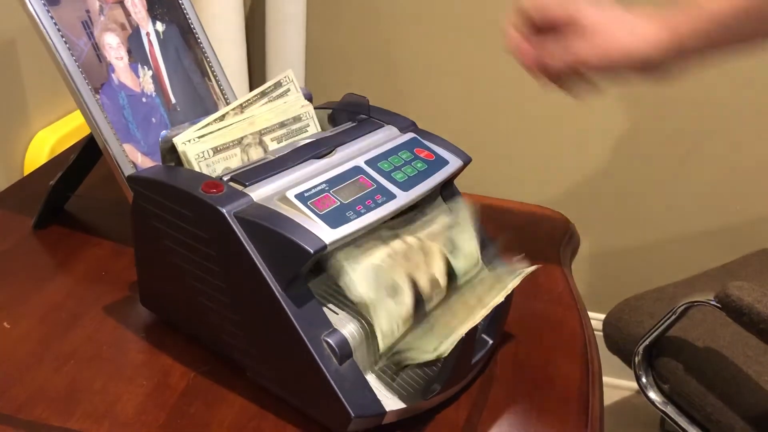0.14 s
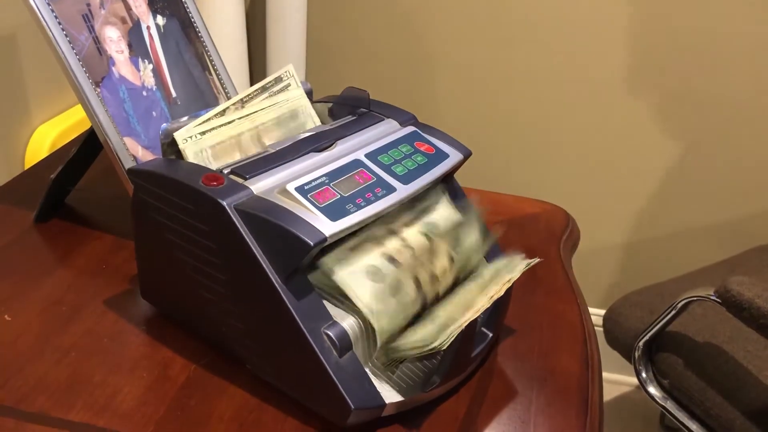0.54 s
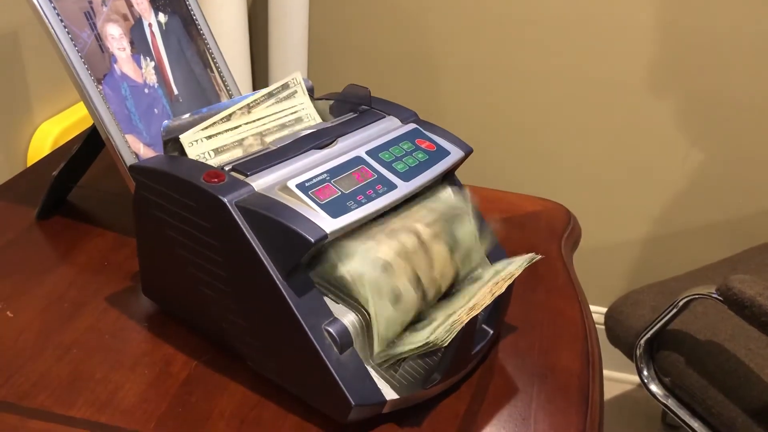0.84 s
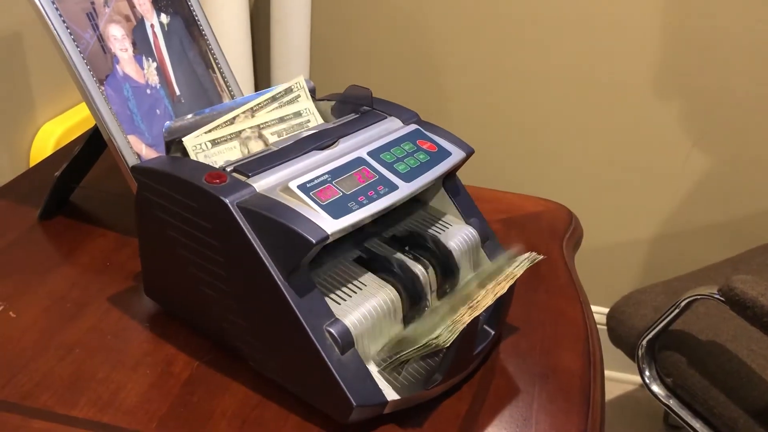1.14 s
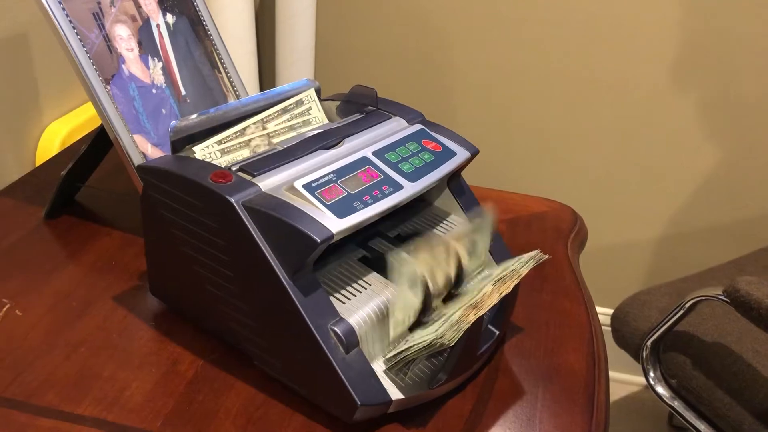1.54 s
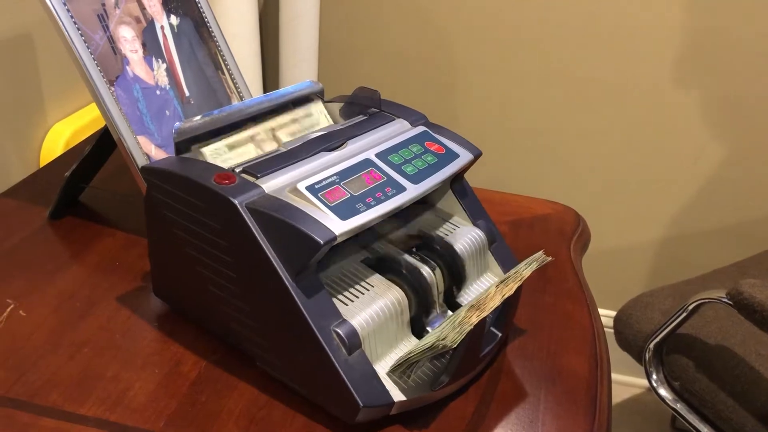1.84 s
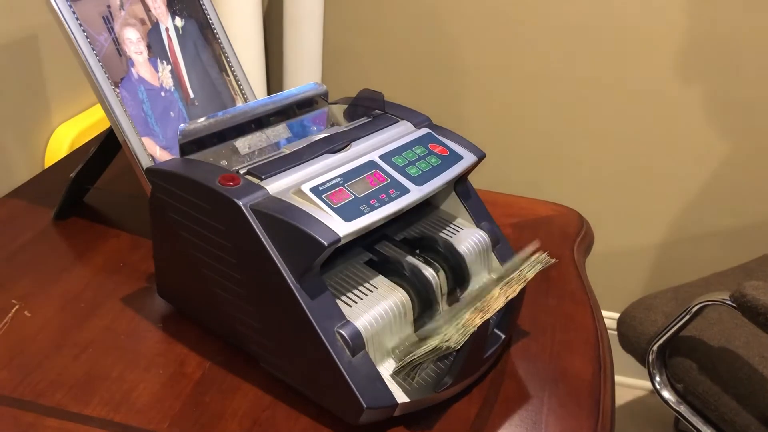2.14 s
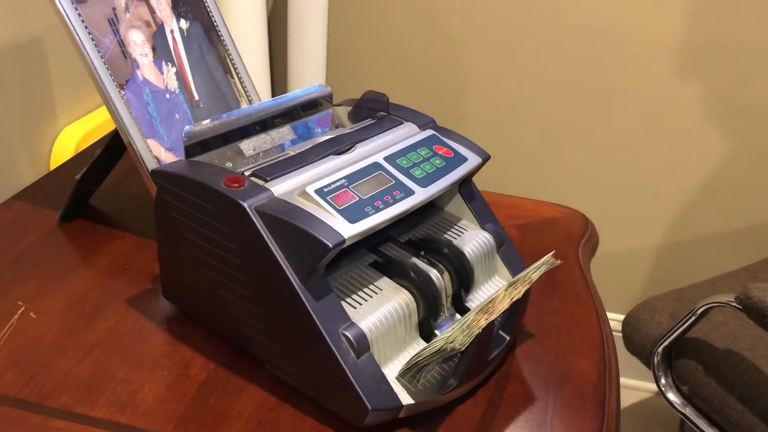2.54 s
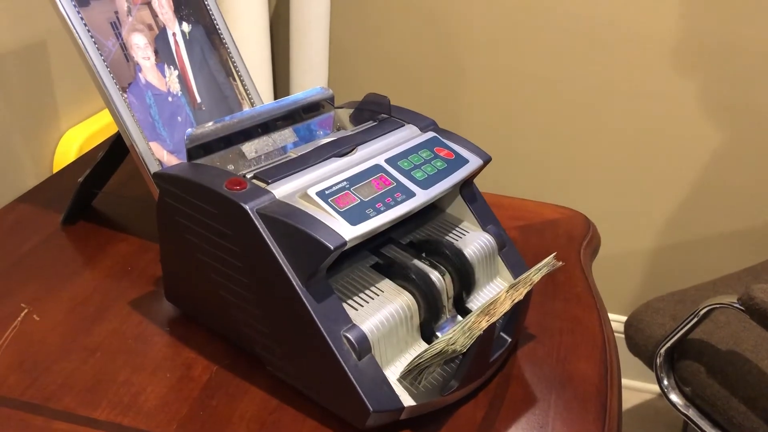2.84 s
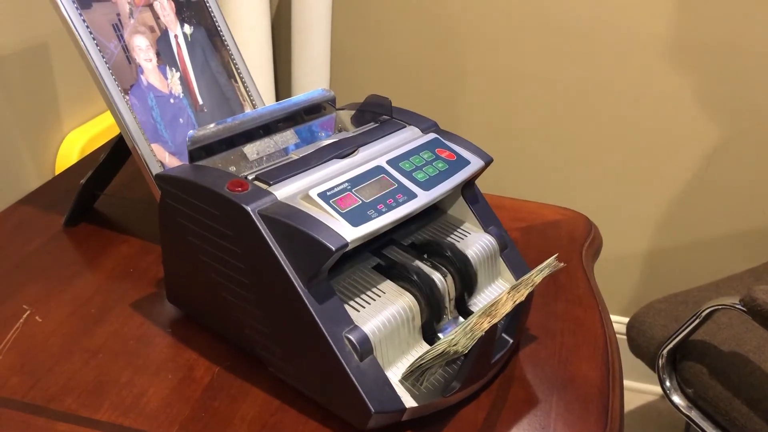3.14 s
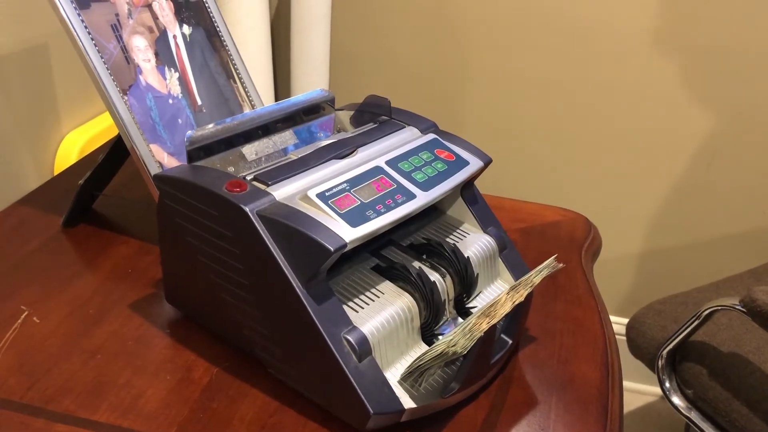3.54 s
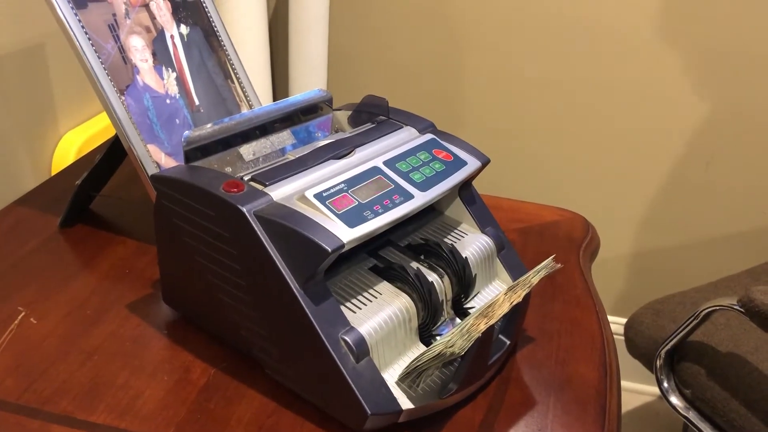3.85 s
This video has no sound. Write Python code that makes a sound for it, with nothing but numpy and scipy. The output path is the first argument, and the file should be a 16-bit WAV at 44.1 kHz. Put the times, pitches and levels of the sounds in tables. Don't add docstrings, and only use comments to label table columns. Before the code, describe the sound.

Electric money counting machine hums and flutters bills rapidly, coasts down, ticks briefly and stops.

```python
import sys
import numpy as np
from scipy import signal
from scipy.fft import rfft, irfft, next_fast_len
from scipy.io import wavfile
from scipy.ndimage import map_coordinates

SR = 44100
rng = np.random.default_rng(int(sys.argv[2]) if len(sys.argv) > 2 else 0)


def generate_wav(sig):
    pcm = np.round(np.clip(np.atleast_2d(sig).T, -1, 1) * 32767).astype(np.int16)
    wavfile.write(sys.argv[1], SR, pcm)


def magnitude_from_level(level_db):
    exponent = np.asarray(level_db, float) / 20
    return 10 ** exponent


N = 176400

# time in seconds, level in dB.
MOTOR_EFFORT = [
    (0, -29.5),
    (.8, -29.5),
    (1, -27.5),
    (2.45, -28),
    (2.58, -32),
    (2.72, -40.5),
    (2.8, -49),
    (2.95, -58),
    (3.2, -65),
]
# time in seconds, pitch in Hz, level in dB.
MAINS_HUM = [
    (0, 121, -37),
    (.8, 120, -38.5),
    (1.05, 118.4, -35),
    (2.53, 121.8, -35),
    (2.57, 116.5, -52),
]
# time in seconds, share of free speed, gear rasp in dB.
SHAFT_LOAD = [
    (0, 1.037, 3.5),
    (.7, 0.98, 3),
    (1.1, 0.97, 2.7),
    (1.3, 0.96, -2.3),
    (1.58, 1.007, 0.5),
    (1.9, 1.002, 2.5),
    (2.1, 0.95, -0.8),
    (2.4, 0.97, -1.2),
]
# time in seconds, share of the beat left.
BEAT_DAMPING = [
    (0, .6),
    (1.0, 0.44),
    (1.95, 0.43),
    (2.1, 1.04),
]
# pitch in Hz, level in dB.
GEAR_TONES = [(183, -53), (280, -43), (415, -40), (455, -47), (485, -36.5), (545, -41.5), (598, -44.5)]
# pitch in Hz, level in dB over the effort.
MESH_LINES = [(754, -25), (875, -26.5), (944, -24), (1146, -25.5), (1304, -25.5), (1595, -28.5),
              (1733, -28.5), (2186, -27.5), (2790, -24), (3743, -29.5), (4808, -21.5), (5515, -26)]
# pitch in Hz, width in Hz, level in dB.
CASING_MODES = [(93, 19, -14.5), (183, 19, -6), (243, 56, -3), (427.5, 32.7, 7.5), (501, 56, 4.5),
                (600, 20, 5), (718, 30, -8), (1305, 33, -5.5)]
# pitch in Hz, width in Hz, level in dB.
GEAR_MODES = [(2460, 160, 2), (2820, 340, 5), (3660, 210, -5.5), (4850, 600, 3.5), (5900, 430, 4),
              (6550, 480, 2.5), (9050, 650, -2), (10000, 700, 0.5), (11850, 950, -4)]
# frequency in Hz, level in dB per Hz.
GEAR_BED_COLOUR = [(200, -77.5), (600, -6.5), (1200, -13), (2000, -16.5), (4840, -20.5), (8000, -18.5),
                   (10000, -24.5), (15800, -23.5)]
# time in seconds, peak level in dB.
ROLLER_KNOCKS = [(2.1144, -19.5), (2.1794, -24), (2.2483, -21), (2.295, -26), (2.3534, -22),
                 (2.4189, -17.5), (2.4638, -20), (2.5357, -21), (2.61, -28), (2.6603, -28), (2.7799, -37)]
# time in seconds, level in dB.
TABLE_SWELL = [
    (0, -77),
    (2.52, -47),
    (2.64, -34.5),
    (2.74, -43),
    (2.86, -42.5),
    (2.93, -65),
]
# time in seconds, pitch in Hz, level in dB.
GEAR_COAST = [
    (2.52, 610, -60),
    (2.62, 560, -44),
    (2.7, 484.7, -43),
    (2.78, 389, -49),
    (2.84, 330, -70),
]
# time in seconds, pitch in Hz, level in dB.
COAST_HUM = [
    (2.52, 104.8, -60),
    (2.57, 92, -50),
    (2.65, 77, -57),
    (2.9, 62, -64),
]

# time in seconds, level in dB.
PAPER_DRAG = [(0, -29.5), (.5, -30), (.85, -30.5), (1.05, -34), (1.2, -33.5), (1.55, -36.5), (1.9, -37.5),
              (2.05, -33), (2.1, -90)]
# frequency in Hz, level in dB per Hz.
DRAG_COLOUR = [(150, -70.5), (500, -9.5), (1300, -12), (2000, -13), (3500, -9.5), (6000, -8), (9000, -12),
               (13500, -12.5), (16000, -18)]
# frequency in Hz, level in dB per Hz.
FLEX_COLOUR = [(150, -54), (700, -5.5), (1400, -5), (3000, -8), (6500, -9), (9000, -12.5), (14500, -20),
               (16000, -31)]
# time in seconds, level in dB, half length in seconds.
NOTE_SWISHES = [
    (0.212, -28, 0.0084),
    (0.46, -29.5, 0.0052),
    (0.914, -32, 0.047),
    (1.01, -31, 0.028),
    (1.243, -37.5, 0.027),
    (1.339, -32.5, 0.013),
    (1.411, -34, 0.02),
    (1.539, -33.5, 0.018),
    (1.974, -33.5, 0.011),
    (2.031, -35, 0.018),
]
# time in seconds, peak level in dB, bright spot in Hz.
STACK_SLAPS = [(0.0294, -12.5, 7460), (0.0618, -15.5, 2570), (0.0702, -10, 4800), (0.0917, -11.5, 2820),
               (0.1235, -8.5, 2200), (0.1307, -18, 5230), (0.1497, -13.5, 6100), (0.188, -17, 2160),
               (0.2023, -12, 4900), (0.2508, -13, 3980), (0.2747, -11, 5410), (0.3114, -12, 4970),
               (0.382, -13.5, 5420), (0.4304, -11, 4680), (0.4898, -11, 4940), (0.5394, -15, 6090),
               (0.5957, -12, 2700), (0.6255, -15, 4440), (0.6524, -14, 2320), (1.2133, -14, 2730),
               (1.3169, -12.5, 2780), (1.395, -18, 2800), (1.511, -19, 2410), (1.9403, -15, 1582),
               (2.0083, -23, 4800), (2.0144, -14.5, 2970), (2.042, -8, 2200)]
# time in seconds, peak level in dB, pitch in Hz.
CORNER_FLICKS = [(0.033, -19, 7600), (0.154, -23, 13700), (0.2009, -12, 13900), (0.2026, -13, 2800),
                 (0.3356, -21, 12800), (0.4469, -16, 13600), (0.615, -21, 13500), (0.7721, -16, 5310),
                 (0.908, -23, 3000), (1.0, -27, 3480), (1.685, -25, 11400), (1.79, -20, 5800),
                 (1.8607, -23, 11600), (2.042, -9, 12000), (2.073, -18, 10000)]

# time in seconds, peak level in dB, bright spot in Hz.
VANE_TICKS = [(2.7104, -37, 3510), (2.7392, -39, 2920), (2.7656, -38, 5500), (2.7921, -38, 3310),
              (2.8174, -36.5, 3080), (2.8459, -36, 5100), (2.872, -41, 6000), (2.8993, -39, 3260),
              (2.9253, -39, 3060), (2.9527, -45, 5030), (2.9781, -43, 2590), (3.0036, -44, 5500),
              (3.03, -43, 6000), (3.056, -44, 6000), (3.083, -41.5, 6300), (3.1108, -41, 2960),
              (3.1338, -37, 3350), (3.1597, -33.5, 3600), (3.1857, -35, 3200), (3.2128, -33, 6300),
              (3.24, -31, 2700), (3.2675, -35, 6200), (3.2994, -37.5, 3090), (3.3313, -43, 4800),
              (3.3648, -45, 6500), (3.4037, -40.5, 5200), (3.4526, -42.5, 4400)]
# pitch in Hz, width in Hz, level in dB.
VANE_MODES = [(1720, 450, 1), (2550, 490, 6), (3366, 810, 2), (4800, 600, 0), (6300, 1300, -4.5),
              (8000, 1800, -8), (12800, 2400, -12)]
# start in seconds, end in seconds, start pitch in Hz,
# end pitch in Hz, level in dB.
WHEEL_WHINE = [(2.72, 3.217, 635, 654, -58.5), (2.798, 3.074, 412, 410.5, -53.5),
               (2.953, 3.22, 533, 542, -57), (3.023, 3.253, 302, 302.6, -56),
               (3.21, 3.42, 419, 416.5, -57.5), (3.338, 3.502, 304, 305, -61)]
# time in seconds, level in dB.
VANE_SCRAPE = [
    (2.4, -66),
    (2.75, -63),
    (3.0, -66),
    (3.27, -62),
    (3.35, -73),
    (3.45, -76),
    (3.55, -85),
]
# pitch in Hz, width in Hz, level in dB.
SLOT_MODES = [(9400, 500, -1), (12400, 790, 1.5), (13700, 820, -1)]
# time in seconds, level in dB.
WHEEL_HISS = [
    (2.4, -51),
    (3.25, -50),
    (3.45, -57),
    (3.62, -72.5),
]
# pitch in Hz, width in Hz, level in dB.
HISS_MODES = [(495, 270, 2.5), (963, 37, -1), (1174, 160, 1), (1650, 430, -4), (3200, 990, -9),
              (6000, 4500, -22.5)]

# frequency in Hz, level in dB per Hz.
ROOM_COLOUR = [(40, -6), (123, -4.5), (230, -19), (1070, -17.5), (2760, -31.5), (7000, -42), (14500, -48),
               (15800, -56)]
# pitch in Hz, width in Hz, level in dB.
DISTANT_DRONES = [(123.4, 13, -51.5), (4300, 760, -75)]

CUT_S, COAST_PER_S, TONES_DIE_DB_PER_S = 2.68, 0.6, 56
TONE_WANDER, TONE_FLUTTER_DB = 0.002, 2.6
CASING_DB, GEARS_DB, BED_DB = -2, -7.5, -8
GEARS_GROW = 1.7
RATTLE_HZ, RATTLE_DB, RATTLE_AT_S, SCATTER_DB = 16.8, 4, 2.425, 1.5
MESH_WIDE_HZ = 21.9
TABLE_HZ, TABLE_WIDE_HZ = 262, 17
SLAP_FADE_S = 0.061
GRAINS_PER_S, GRAIN_SPREAD_DB, GRAIN_DB = 1200, 2.5, -3.5
GRAIN_HZ, GRAIN_CYCLES = 4900, 4.8
PING_CYCLES, PING_DB = 57, -0.5
VANE_S, TICK_FADE_S = 0.0265, 0.041
TICK_DB, EARLY_TICK_DB = -5.5, -37
WHINE_EDGE_S = 0.03
T60_S, WET_DB = 0.34, -17.5
ROOM_DB = -50
BRUSH_S, BRUSH_WIDE_S, BRUSH_DB = 3.9, 0.025, -66
LOW_HZ, TOP_HZ = 70, 15750


def unit(x):
    return x / np.sqrt(np.mean(x ** 2) + 1e-20)


def seconds():
    return np.arange(N) / SR


def curves(rows):
    s, *columns = np.transpose(rows)
    return [np.interp(seconds(), s, column) for column in columns]


def wobble(rate):
    knots = rng.standard_normal(int(N * rate / SR) + 4)
    return map_coordinates(knots, [np.arange(N) * rate / SR])


def sine(hz):
    return np.sin(2 * np.pi * np.cumsum(hz) / SR)


def bump(centre_s, half_s):
    return np.exp(-((seconds() - centre_s) / half_s) ** 2)


def filtered(x, response):
    m = next_fast_len(len(x) + 8192)
    spectrum = rfft(x, m) * response(np.fft.rfftfreq(m, 1 / SR))
    return irfft(spectrum, m)[:len(x)]


def colour(points):
    f, db = np.transpose(points)
    return lambda hz: magnitude_from_level(np.interp(np.log(hz + 1), np.log(f + 1), db))


def body(peaks):
    def response(f):
        total = 0
        for k, (centre, width, db) in enumerate(peaks):
            mode = 1j * f * width / (centre * centre - f * f + 1j * f * width)
            total = total + (-1) ** k * magnitude_from_level(db) * mode
        return total
    return response


def bands(peaks):
    def response(f):
        power = 0
        for peak in peaks:
            skirt = 1 + ((f - peak[0]) / peak[1]) ** 2
            power = power + np.abs(body([peak])(f)) ** 2 / skirt
        return np.sqrt(power)
    return response


def noise(response):
    return unit(filtered(rng.standard_normal(N), response))


def bursts(rows, response, fade_s, tint_gain):
    out, t = np.zeros(N + SR), np.arange(SR // 8) / SR
    fade = magnitude_from_level(-60 * t / max(fade_s, 0.004))
    snap = 0.39 * magnitude_from_level(-60 * t / 0.013)
    shape = (fade + snap) * (1 - np.exp(-t / 0.00092))
    for s, db, hz in rows:
        tint = lambda f: response(f) * (1 + tint_gain * np.exp(-(np.log((f + 1) / hz) / 0.13) ** 2))
        puff = shape * filtered(rng.standard_normal(len(t)), tint)
        level = magnitude_from_level(db) * np.linalg.norm(shape) / np.linalg.norm(puff)
        out[round(s * SR):][:len(t)] += level * puff
    return out[:N]


def glide(rows, flutter_db):
    first, last = rows[0], rows[-1]
    lead_in = [(first[0] - 0.02, first[1], -120)]
    lead_out = [(last[0] + 0.02, last[1], -120)]
    hz, db = curves(lead_in + rows + lead_out)
    level = np.sqrt(2) * magnitude_from_level(db + flutter_db * wobble(18))
    return level * sine(hz * (1 + 0.004 * wobble(30.17)))


def mains_hum():
    last = MAINS_HUM[-1]
    hz, db = curves(MAINS_HUM + [(last[0] + 0.05, last[1], -120)])
    return np.sqrt(2) * magnitude_from_level(db + 0.75 * wobble(10)) * sine(hz)


def gear_tones(speed):
    die_db = TONES_DIE_DB_PER_S * np.maximum(seconds() - CUT_S, 0)
    tones = 0
    for hz, db in GEAR_TONES:
        level_db = db + 31 - die_db + TONE_FLUTTER_DB * wobble(39.99)
        tones = tones + magnitude_from_level(level_db) * sine(hz * speed)
    return tones


def gear_rattle(speed):
    turns = RATTLE_HZ * (np.cumsum(np.sqrt(speed)) / SR - RATTLE_AT_S)
    beat = np.cos(2 * np.pi * turns + 0.85 * wobble(4.034))
    beat_db = RATTLE_DB * curves(BEAT_DAMPING)[0] * beat + SCATTER_DB * wobble(57)
    rasp_db = curves(SHAFT_LOAD)[1]
    rasp = magnitude_from_level(GEARS_DB + rasp_db + beat_db) * noise(bands(GEAR_MODES))
    bed = magnitude_from_level(BED_DB + 0.43 * beat_db + 0.32 * wobble(28.0)) * noise(colour(GEAR_BED_COLOUR))
    return rasp + bed


def feed_motor():
    effort_db, = curves(MOTOR_EFFORT)
    coasting = np.exp(-COAST_PER_S * np.maximum(seconds() - CUT_S, 0))
    speed = coasting * curves(SHAFT_LOAD)[0] * (1 + TONE_WANDER * wobble(12.05))
    casing = magnitude_from_level(CASING_DB + 0.57 * wobble(60)) * noise(body(CASING_MODES))
    mesh = sum(magnitude_from_level(db + 1.85 * wobble(14)) * noise(bands([(hz, MESH_WIDE_HZ, 0)])) for hz, db in MESH_LINES)
    driven = magnitude_from_level(effort_db) * (gear_tones(speed) + casing + mesh)
    rattle_db = -29 + GEARS_GROW * (np.minimum(effort_db, -27) + 28.5)
    rattle = magnitude_from_level(rattle_db) * gear_rattle(speed)
    table = magnitude_from_level(curves(TABLE_SWELL)[0]) * noise(body([(TABLE_HZ, TABLE_WIDE_HZ, 0)]))
    knock_rows = [(s, db - 7.5, 10000) for s, db in ROLLER_KNOCKS]
    knocks = bursts(knock_rows, body(GEAR_MODES), 0.043, tint_gain=0.85)
    slowing = glide(GEAR_COAST, flutter_db=0.0) + glide(COAST_HUM, flutter_db=2.5)
    return mains_hum() + driven + rattle + table + knocks + slowing


def crackle():
    when, size = rng.random((2, round(GRAINS_PER_S * N / SR)))
    scatter = np.exp(0.6 * rng.standard_normal(len(when)))
    hz = np.clip(GRAIN_HZ * scatter, 900, 14500)[:, None]
    k = np.arange(256)
    level = (0.093 + size[:, None]) ** (-GRAIN_SPREAD_DB / 8)
    fade = magnitude_from_level(-30 * k / SR * hz / GRAIN_CYCLES)
    rings = level * fade * np.sin(2 * np.pi * hz * k / SR)
    places = (when * N).astype(int)[:, None] + k
    return unit(np.bincount(places.ravel(), rings.ravel())[:N])


def corner_flicks():
    out, t = np.zeros(N + SR), np.arange(SR // 40) / SR
    for s, db, hz in CORNER_FLICKS:
        drift = 0.8 * np.cumsum(rng.standard_normal(len(t))) / 10
        ring = np.sin(2 * np.pi * hz * t + drift)
        fade_db = -60 * t * np.sqrt(hz * 6000) / PING_CYCLES
        out[round(s * SR):][:len(t)] += magnitude_from_level(db + PING_DB + fade_db) * (1 - np.exp(-t / 0.00033)) * ring
    return out[:N]


def notes():
    swish = sum(magnitude_from_level(db) * bump(s, half_s) for s, db, half_s in NOTE_SWISHES)
    level = magnitude_from_level(curves(PAPER_DRAG)[0] + 0.56 * wobble(38.2))
    drag = level * noise(colour(DRAG_COLOUR))
    whip = swish * magnitude_from_level(4.7) * noise(colour(FLEX_COLOUR))
    creases = (level + swish) * magnitude_from_level(GRAIN_DB) * crackle()
    slaps = magnitude_from_level(-8.5) * bursts(STACK_SLAPS, colour(FLEX_COLOUR), SLAP_FADE_S, tint_gain=0.96)
    return drag + whip + creases + corner_flicks() + slaps


def vane_ticks():
    times = np.arange(VANE_TICKS[0][0] - VANE_S, 0, -VANE_S)
    bright_hz = rng.uniform(2200, 6700, len(times))
    early = [(s, EARLY_TICK_DB, hz) for s, hz in zip(times, bright_hz)]
    rows = [(s, db + TICK_DB, hz) for s, db, hz in VANE_TICKS + early]
    return bursts(rows, bands(VANE_MODES), TICK_FADE_S, tint_gain=0.85)


def wheel_whine():
    whine = 0
    for start, end, hz0, hz1, db in WHEEL_WHINE:
        rise = [(start - WHINE_EDGE_S, hz0, db - 12), (start, hz0, db)]
        fall = [(end, hz1, db), (end + WHINE_EDGE_S, hz1, db - 12)]
        whine = whine + glide(rise + fall, flutter_db=1.7)
    return whine


def stacker():
    vanes_past = (seconds() - VANE_TICKS[0][0] - 0.008) / VANE_S
    passing_db = 2.7 * np.cos(2 * np.pi * vanes_past + 0.6 * wobble(6.3))
    scrape = magnitude_from_level(curves(VANE_SCRAPE)[0] + passing_db + 3.2 * wobble(35)) * noise(bands(SLOT_MODES))
    hiss = magnitude_from_level(curves(WHEEL_HISS)[0] + passing_db + 1.3 * wobble(20)) * noise(bands(HISS_MODES))
    return vane_ticks() + wheel_whine() + scrape + hiss


def walls(x):
    t = np.arange(SR // 2) / SR
    tail = rng.standard_normal(len(t)) * magnitude_from_level(-60 * t / T60_S) * (t > 0.006)
    return signal.fftconvolve(x, tail / np.linalg.norm(tail))[:N]


def room_tone():
    air = magnitude_from_level(ROOM_DB - 3.5 + 1.6 * wobble(5.16)) * noise(colour(ROOM_COLOUR))
    drones = sum(magnitude_from_level(db + 1.8 * wobble(8)) * noise(body([(hz, wide, 0)])) for hz, wide, db in DISTANT_DRONES)
    brush = magnitude_from_level(BRUSH_DB) * bump(BRUSH_S, BRUSH_WIDE_S) * noise(colour([(3000, -35), (7000, 3)]))
    return air + drones + brush


def scene():
    near = notes() + stacker()
    mix = feed_motor() + near + magnitude_from_level(WET_DB) * walls(near) + room_tone()
    return np.tile(mix, (2, 1))


def top_cut(x):
    return signal.sosfilt(signal.butter(12, 16370, fs=SR, output="sos"), x)


def record(dry):
    band = lambda f: (f < TOP_HZ) * f ** 2 / (f ** 2 + LOW_HZ ** 2)
    mix = np.array([filtered(channel, band) for channel in dry])
    return top_cut(mix)


dry = scene()
out = record(dry)
generate_wav(out)
```